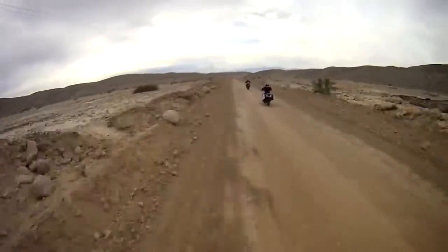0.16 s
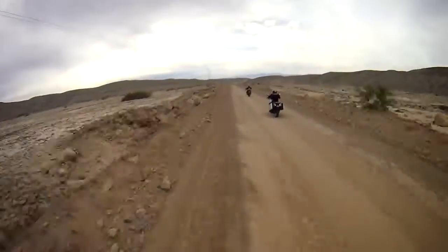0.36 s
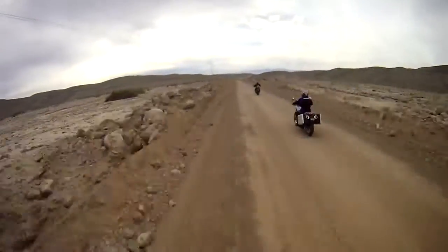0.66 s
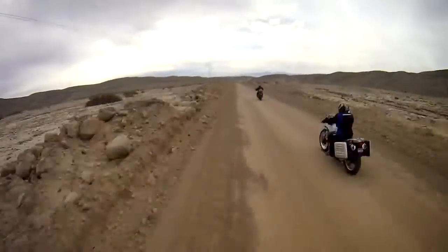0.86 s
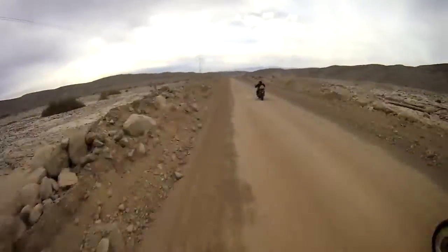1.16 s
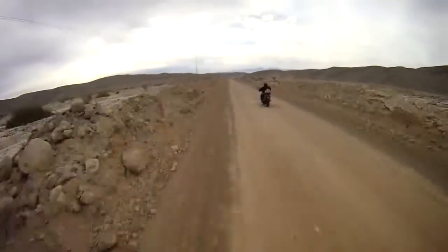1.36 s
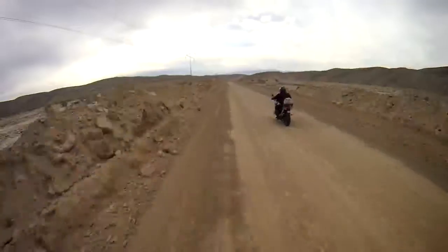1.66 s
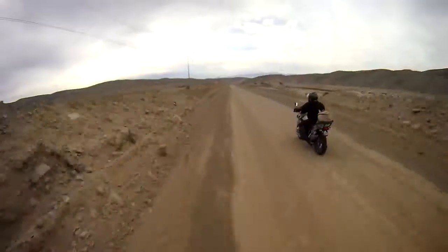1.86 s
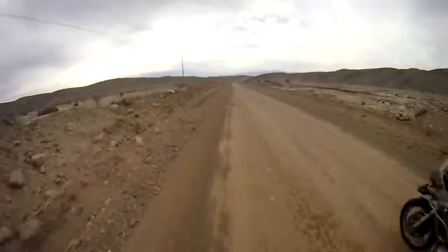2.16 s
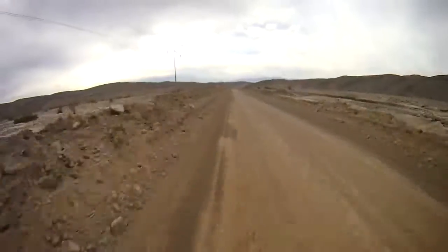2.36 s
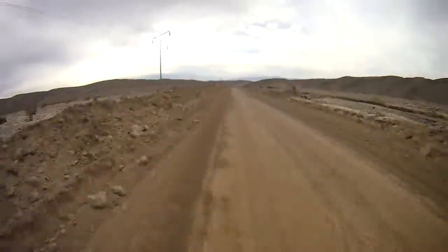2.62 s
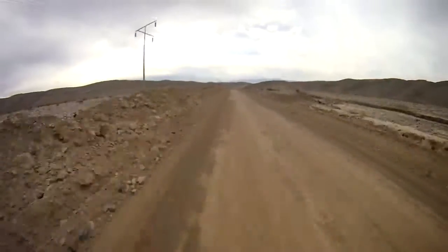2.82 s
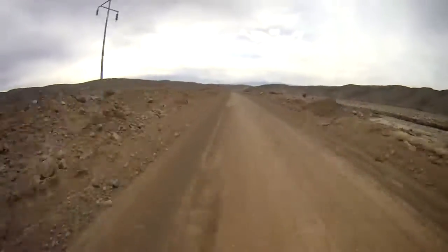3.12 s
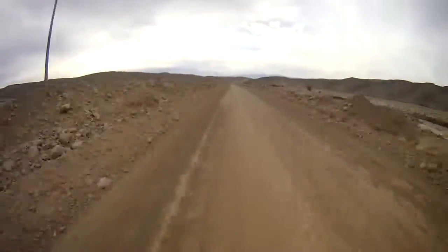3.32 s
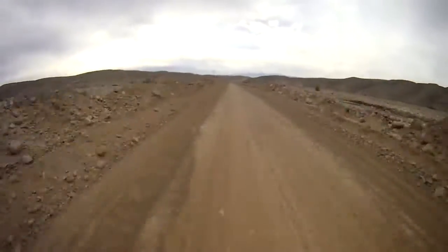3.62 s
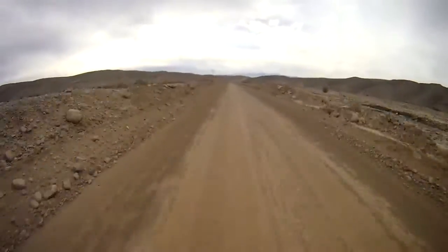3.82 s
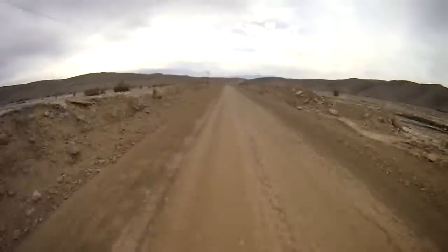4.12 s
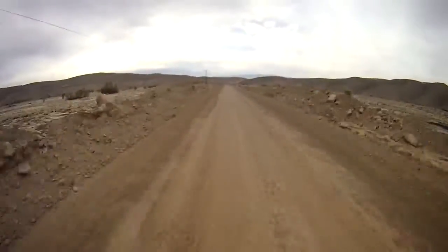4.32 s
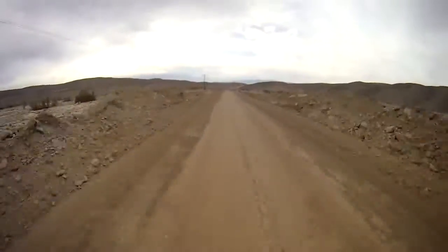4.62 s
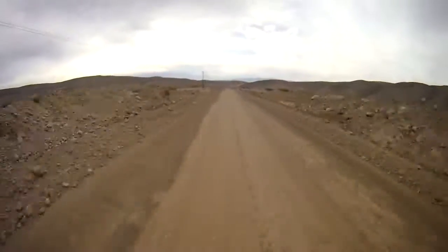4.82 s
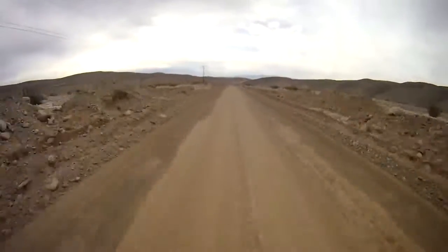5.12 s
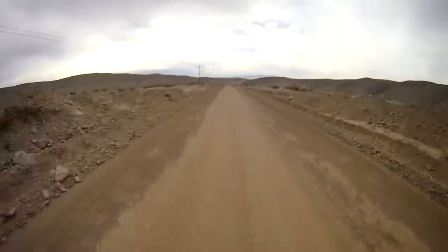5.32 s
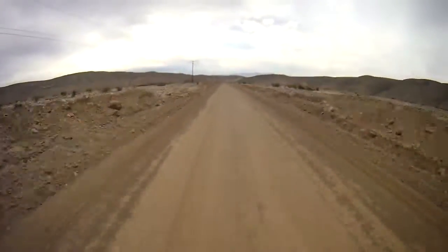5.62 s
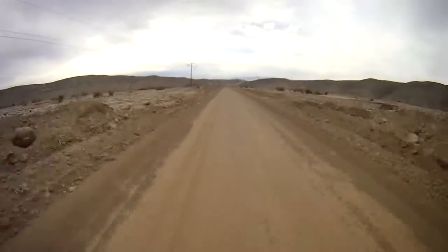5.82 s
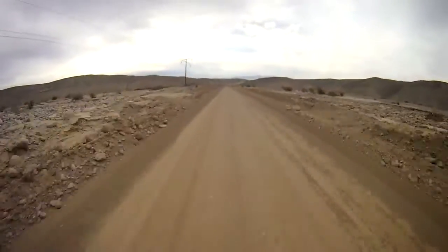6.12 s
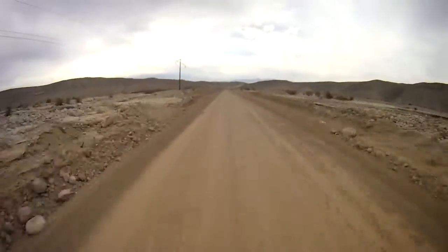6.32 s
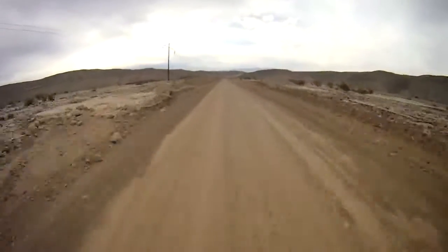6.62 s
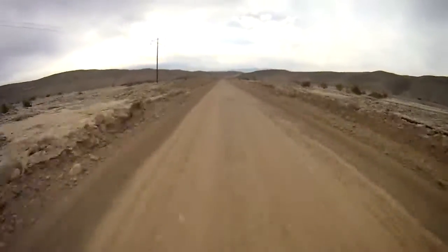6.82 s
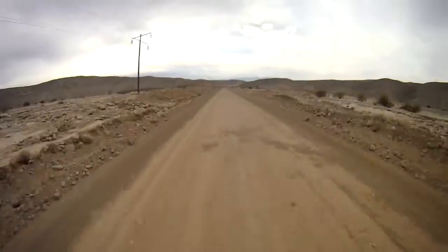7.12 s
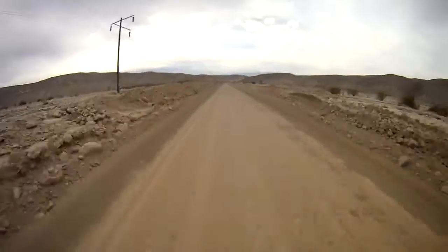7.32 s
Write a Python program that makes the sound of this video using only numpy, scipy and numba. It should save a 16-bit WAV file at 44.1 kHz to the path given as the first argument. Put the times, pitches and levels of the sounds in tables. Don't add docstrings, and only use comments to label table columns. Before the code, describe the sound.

Continuous overloaded wind buffeting at riding speed, a low crackling, fluttering roar with hollow mid-range hiss, burying the engine and tyres completely.

```python
import sys
import numpy as np
from scipy import signal
from scipy.fft import rfft, irfft
from scipy.io import wavfile
from scipy.ndimage import uniform_filter1d
from numba import njit

SR = 44100
rng = np.random.default_rng(int(sys.argv[2]) if len(sys.argv) > 2 else 0)


def to_wav(sig):
    pcm = np.clip(np.atleast_2d(sig), -1, 1) * 32767
    pcm = np.round(pcm).astype(np.int16)
    wavfile.write(sys.argv[1], SR, pcm.T)


def amplitude_ratio(level_db):
    exponent = np.asarray(level_db, float) / 20
    return 10 ** exponent


N = 329427


def unit_rms(x):
    return x / np.sqrt(np.mean(x ** 2))


@njit
def moving_bandpass(x, center_hz, width_hz):
    out = np.empty(len(x))
    band_state, low_state = 0., 0.
    for i in range(len(x)):
        g = np.tan(np.pi * center_hz[i] / SR)
        damping = width_hz / center_hz[i]
        band = (band_state + g * (x[i] - low_state)) / (1 + g * (g + damping))
        band_state = 2 * band - band_state
        low_state = low_state + 2 * g * band
        out[i] = damping * band
    return out


def ringing_noise(center_hz, width_hz):
    once = moving_bandpass(rng.standard_normal(N), center_hz, width_hz)
    return unit_rms(moving_bandpass(once, center_hz, width_hz))


def wander(rate_hz):
    hold = int(SR / rate_hz)
    steps = np.repeat(rng.standard_normal(N // hold + 1), hold)
    slewed = uniform_filter1d(uniform_filter1d(steps, hold), hold)
    return unit_rms(slewed[:N])


def air_speed_db(t):
    start_m_s, accel_m_s2 = 27, .25
    return 20 * np.log10(1 + accel_m_s2 * t / start_m_s)


# (time [s], level [dB])
GUSTS = [
    (0, -1),
    (.5, 2),
    (3, 0.5),
    (3.5, -1),
    (4.5, 2.4),
    (6, 0),
]


def side_gusts_db(t):
    spread_s = 0.2
    return sum(db * np.exp(-.5 * ((t - s) / spread_s) ** 2) for s, db in GUSTS)


# (resonance [Hz], width [Hz], level [dB])
HOLLOWS = [
    (764, 297, -4),
    (1495, 440, -5),
    (1813, 320, -7.5),
    (3340, 650, -18.5),
    (4560, 530, -22),
]


def whoosh(flow_db):
    puffs_db = 0.49 * wander(rate_hz=40.) + 0.33 * wander(rate_hz=9.)
    hollows = 0
    for hz, width_hz, db in HOLLOWS:
        flicker_db = 0.71 * wander(rate_hz=25.)
        drifting_hz = hz * (1 + 0.041 * wander(rate_hz=5.))
        hollows = hollows + amplitude_ratio(db + flicker_db) * ringing_noise(drifting_hz, 1.54 * width_hz)
    port = signal.butter(2, 6500, fs=SR, output="sos")
    return signal.sosfilt(port, hollows) * amplitude_ratio(flow_db + puffs_db)


# (time [s], push + or pull - [sign], length [ms])
SLAPS = [(.732, 1, 6), (1.959, -1, 6), (2.59, -1, 6.5), (4.024, 1, 6.5), (4.488, 1, 6), (5.063, 1, 6),
         (5.762, 1, 6), (5.771, -1, 5.5), (6.015, -1, 7.5), (6.052, -1, 5.5), (6.059, 1, 7), (6.103, 1, 7),
         (6.362, 1, 6), (6.709, 1, 5.5), (6.721, -1, 5.5), (6.826, 1, 6), (7.194, -1, 6.5), (7.201, 1, 7)]


def slaps(t, rumble):
    slap_s, sign, length_ms = np.transpose(SLAPS)[:, :, None]
    place = np.clip((t - slap_s) / (length_ms / 1000 * 1.08), -1, 1)
    reach = np.cos(np.pi * place / 2)
    shapes = sign * reach * np.cos(np.pi * place)
    push = amplitude_ratio(11) * np.sum(shapes, axis=0)
    return push + rumble * (1 - reach.max(axis=0))


# (frequency [Hz], level [dB per Hz])
EDDIES = [(12, -7), (25, -5), (45, -2), (80, -0.38), (160, -0.18), (200, -2.5), (320, -10.5), (500, -18.5),
          (650, -26.5), (1000, -40.5), (2500, -48), (6000, -59), (10000, -72), (16000, -80)]


def buffeting(flow_db):
    hz = np.maximum(np.arange(N // 2 + 1) * SR / N, 1)
    eddy_hz, eddy_db = np.transpose(EDDIES)
    spectrum = amplitude_ratio(np.interp(np.log(hz), np.log(eddy_hz), eddy_db))
    eddies = irfft(rfft(rng.standard_normal(N)) * spectrum, N)
    shedding_hz = 146.0 * (1 + 0.1506 * wander(rate_hz=5.))
    shedding = ringing_noise(shedding_hz, 58.8)
    rumble = unit_rms(unit_rms(eddies) + amplitude_ratio(-9) * shedding)
    return rumble * amplitude_ratio(flow_db + 0.6 * wander(rate_hz=10.))


def scene():
    t = np.arange(N) / SR
    speed_db = air_speed_db(t)
    buffet_power, whoosh_power = 1.74, 5.8
    rumble = buffeting(2.5 + buffet_power * speed_db + side_gusts_db(t))
    hiss = whoosh(-17.5 + whoosh_power * speed_db)
    return (slaps(t, rumble) + hiss)[None]


def band_limit(x):
    return signal.sosfilt(signal.butter(12, 16480, fs=SR, output="sos"), x)


def record(dry):
    rail, ceiling, coupling_hz = .712, .707, 1.3
    railed = np.clip(dry, -rail, rail)
    sagged = signal.lfilter([1, -1], [1, -np.exp(-2 * np.pi * coupling_hz / SR)], railed)
    wobble = amplitude_ratio(-35) * ringing_noise(np.full(N, 250.), 460.0)
    converted = np.clip(sagged + wobble, -ceiling, ceiling)
    top_cut = signal.ellip(12, .02, 60, 15700, fs=SR, output="sos")
    finished = signal.sosfiltfilt(top_cut, converted)
    return band_limit(finished)


dry = scene()
out = record(dry)
to_wav(out)
```